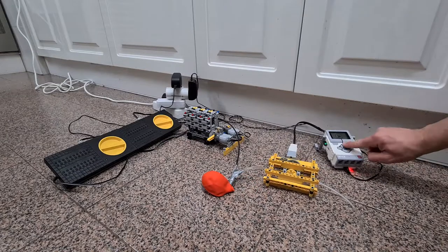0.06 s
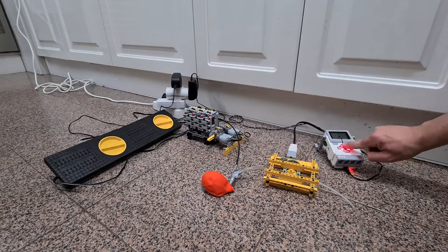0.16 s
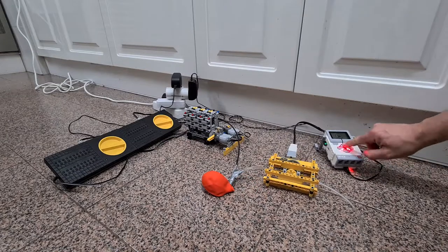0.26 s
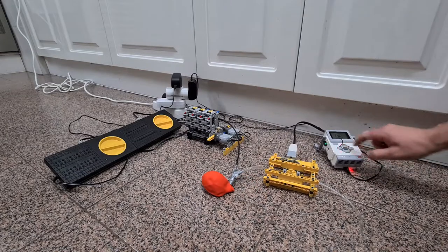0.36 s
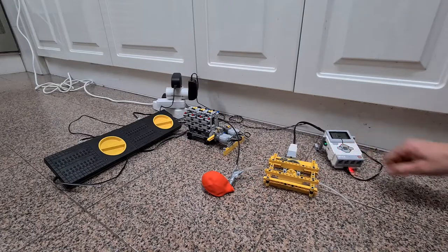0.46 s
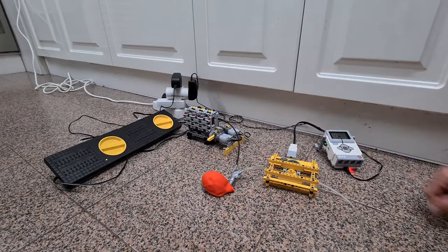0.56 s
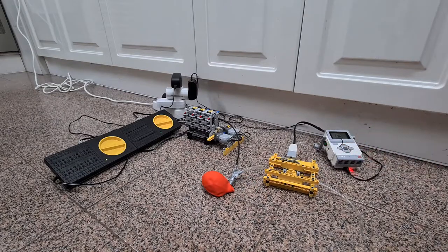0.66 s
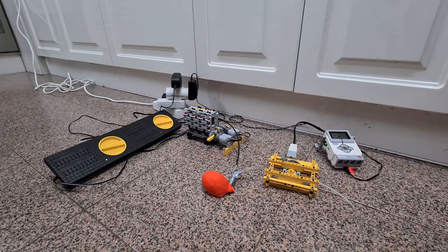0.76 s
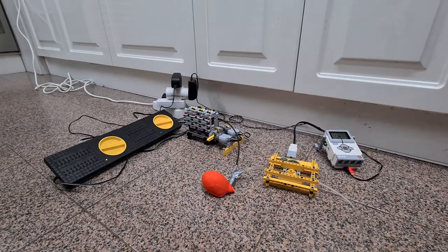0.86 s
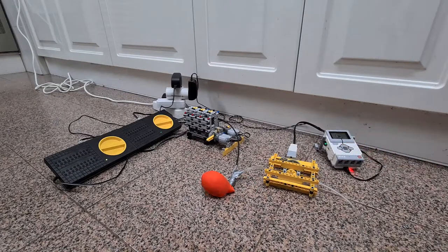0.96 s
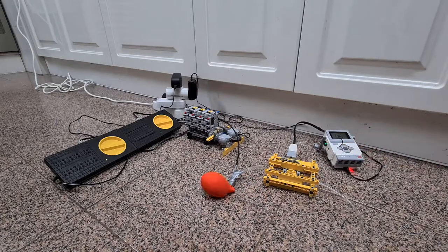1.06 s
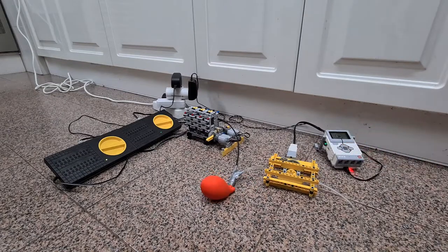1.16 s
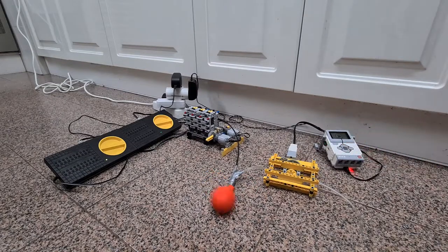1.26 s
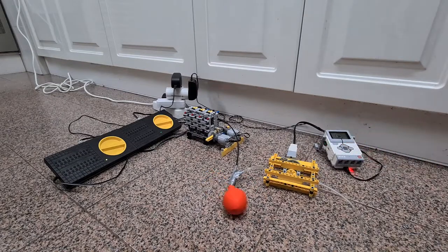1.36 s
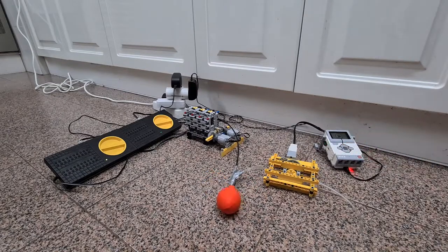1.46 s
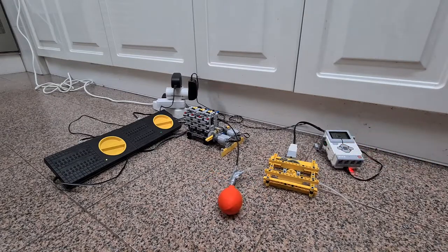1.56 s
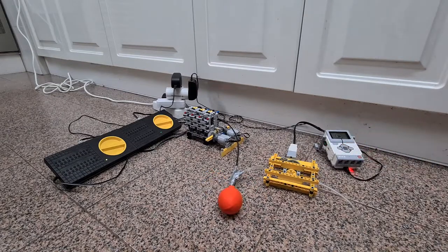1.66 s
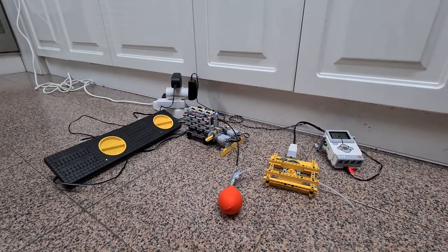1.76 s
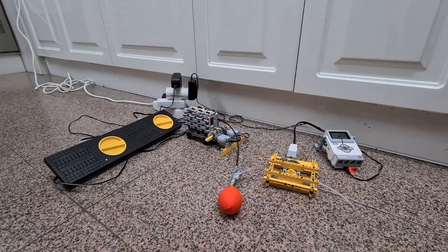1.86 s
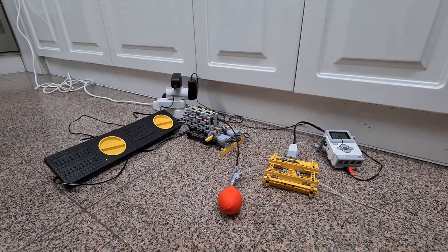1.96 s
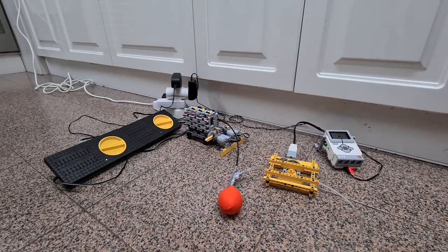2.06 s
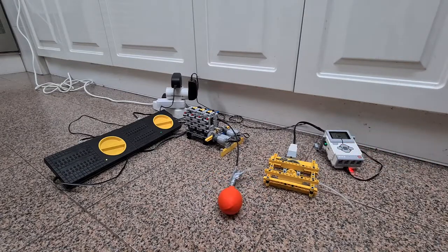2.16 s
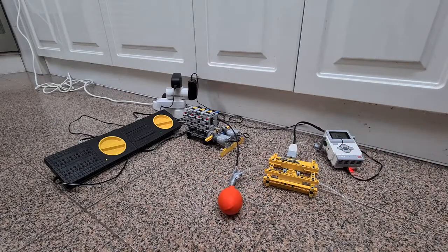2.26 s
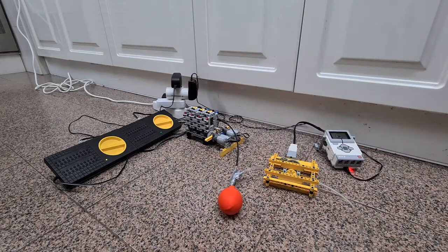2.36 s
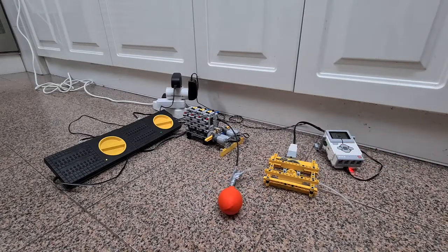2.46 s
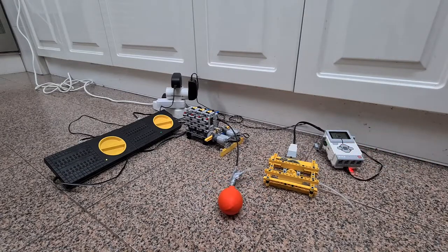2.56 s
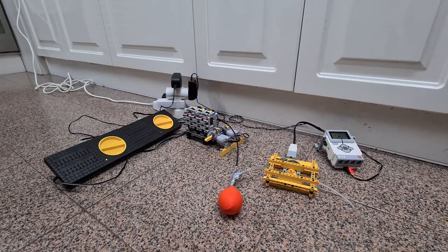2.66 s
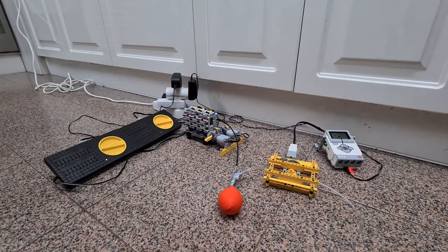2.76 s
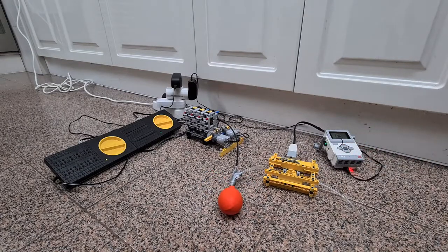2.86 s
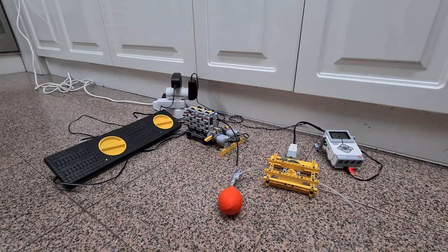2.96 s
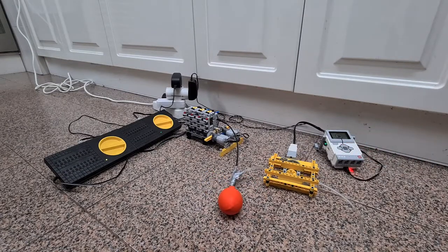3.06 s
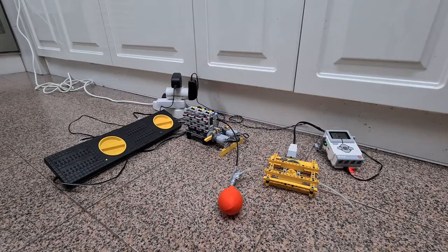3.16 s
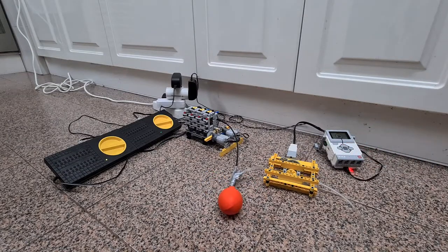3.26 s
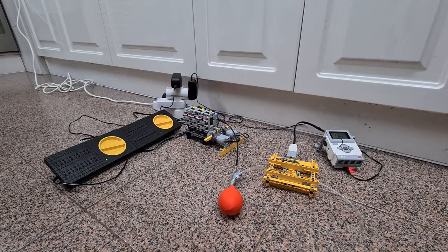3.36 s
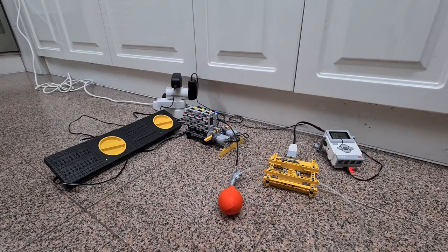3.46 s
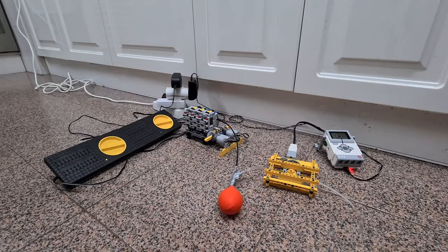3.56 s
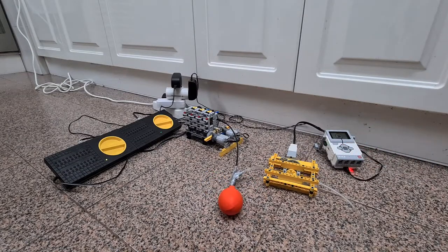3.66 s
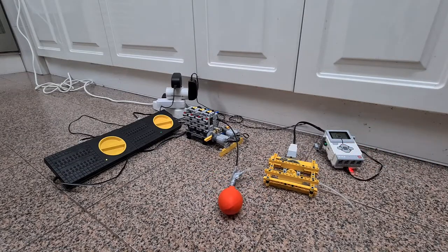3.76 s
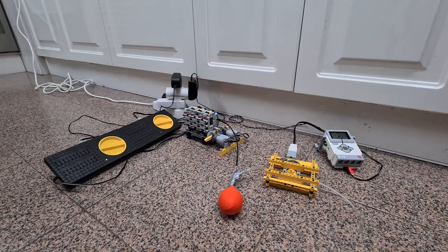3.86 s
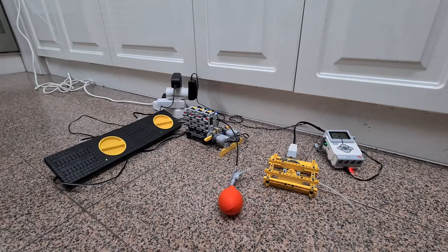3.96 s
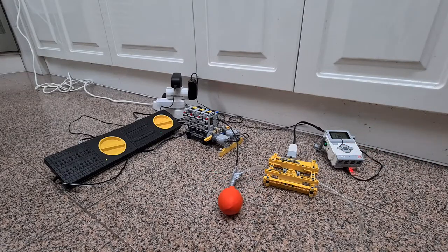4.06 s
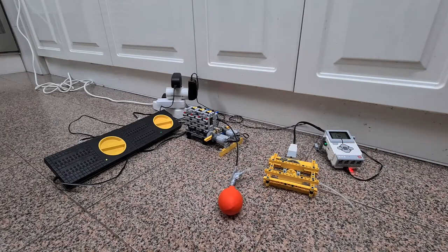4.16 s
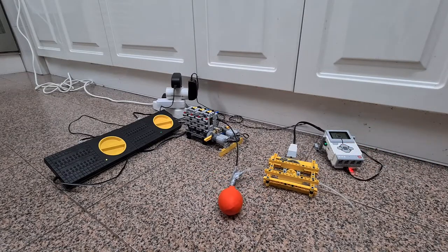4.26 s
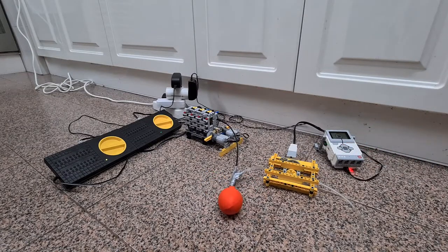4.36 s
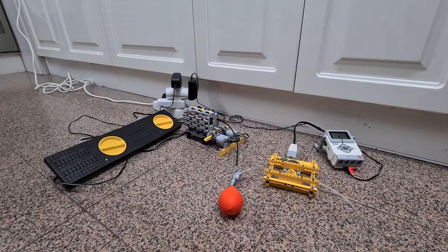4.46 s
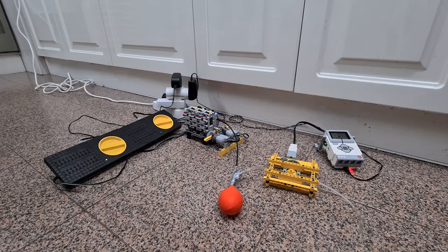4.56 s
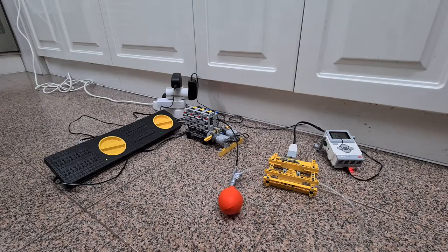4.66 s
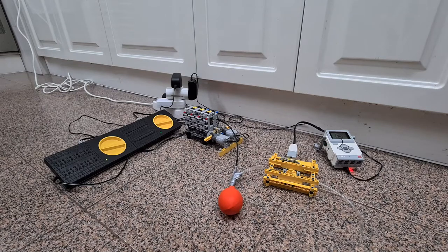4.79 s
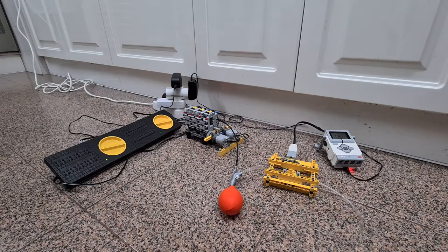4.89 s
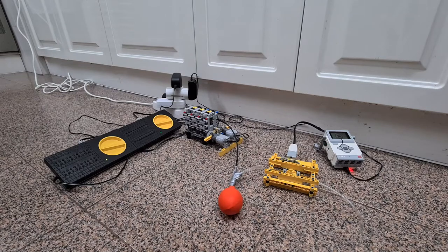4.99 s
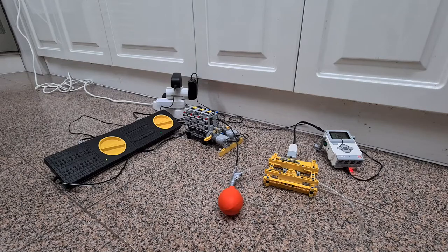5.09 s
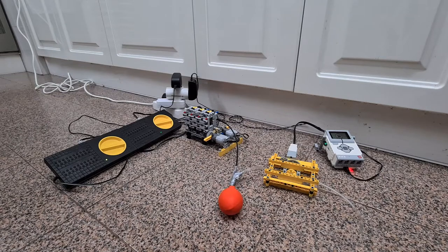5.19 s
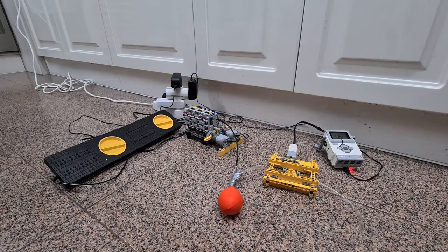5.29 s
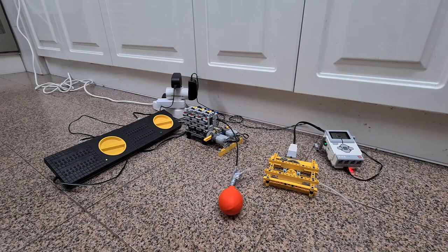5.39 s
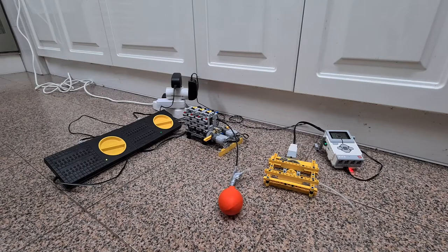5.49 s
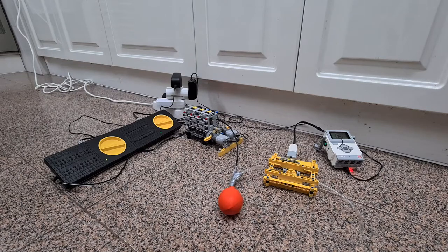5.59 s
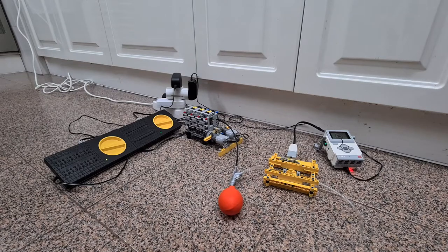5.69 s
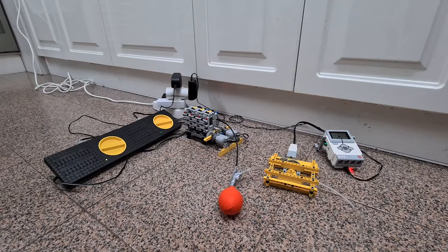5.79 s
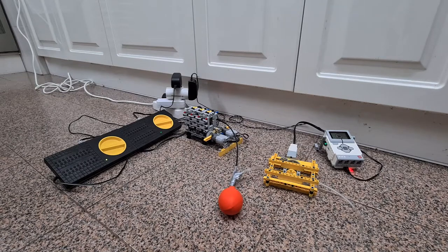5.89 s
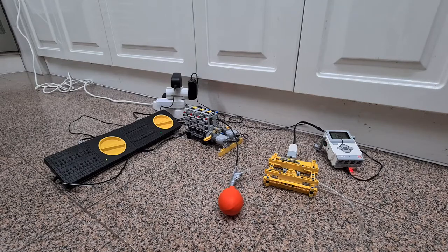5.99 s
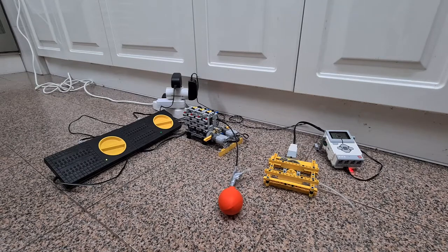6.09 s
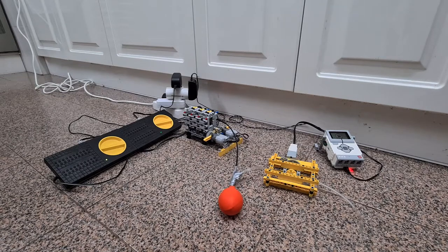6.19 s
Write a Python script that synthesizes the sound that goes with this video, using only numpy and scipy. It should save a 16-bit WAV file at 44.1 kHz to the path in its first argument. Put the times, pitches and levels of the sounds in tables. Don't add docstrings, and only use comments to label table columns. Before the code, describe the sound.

In a quiet kitchen, a finger presses a plastic button with a sharp snap, then lets it go with a duller knock. After a short pause, loose gears rattle and a small motor jumps to full speed. Toy piston pumps then run steadily to the end, with bright airy hiss, quick uneven valve ticking and a faint low throb. The microphone is fairly near, in stereo, with short hard-floor echoes.

```python
import sys
import numpy as np
from scipy import signal
from scipy.fft import rfft, irfft, next_fast_len
from scipy.io import wavfile

SR = 44100
rng = np.random.default_rng(int(sys.argv[2]) if len(sys.argv) > 2 else 0)


def elevation(decibels):
    levels = np.asarray(decibels, float)
    return 10 ** (levels / 20)


def inscribe(sig):
    pcm = np.round(np.clip(np.atleast_2d(sig).T, -1, 1) * 32767)
    wavfile.write(sys.argv[1], SR, pcm.astype(np.int16))


N = 274743
TIME = np.arange(N) / SR
SIZE = next_fast_len(N + SR // 2)
HZ = np.maximum(np.arange(SIZE // 2 + 1) * SR / SIZE, 1)

# start_s, level_db
GEAR_RUN_UP = [(.594, -74), (.599, -52), (.625, -49.5), (.645, -43), (.69, -49.5), (.755, -34), (.9, -33.7)]
# pitch_hz, level_db (per Hz)
GEAR_HISS = [(150, -32), (300, -23), (520, -21), (850, -13), (1150, -4), (1520, -12), (2300, -5),
             (3450, -5), (4330, -8), (5200, -4), (8400, -3), (9200, -6.5), (13000, -9.5), (14600, -12),
             (16500, -12.5)]
# pitch_hz, width_hz, level_db (over the hiss)
HOUSING = [(365, 83, 8), (445, 28, 11), (587, 55, 12.5), (757, 27, 6.5), (970, 120, 6), (1040, 86, 0.5),
           (1390, 470, 5), (1436, 44, 10)]
# pitch_hz, width_hz, level_db (over the hiss)
TUBE = [(1937, 65, 14), (2930, 180, 4), (2947, 510, 5.5), (3740, 300, 6.5), (4710, 130, 11),
        (4870, 150, 4.5), (5795, 400, 5), (6700, 470, 4), (7550, 120, 4.5), (8180, 120, 4)]
# pitch_hz, width_hz, level_db
HOLLOWS = [(513, 72, -10.5), (834, 57, -11), (1007, 4.7, -17), (1419, 21, -28), (1550, 43, -11),
           (2360, 39, -11), (3480, 56, -6.5), (4630, 68, 3), (5130, 90, -4.5)]
VALVE_DB = [-23.5, -27.5, -34, -27, -28.5, -34.5]
# pitch_hz, level_db (per Hz)
VALVE_TICK = [(300, -17), (1000, -5.5), (3000, -5.5), (6000, -1), (9000, -2), (12500, -2.5), (14500, -4.5),
              (16500, -11)]
# place_turns (0-1), swings_per_turn, peak_db
THROBS = [(.21, 12.4, -60), (.444, 13.2, -57.5), (.27, 16.8, -60), (.661, 16.8, -57.5), (.44, 29.1, -63),
          (.866, 12, -62), (.6, 59, -59), (.3, 57, -65), (.52, 77, -69), (.68, 95, -60), (.2, 119, -63),
          (.02, 93, -63), (.72, 118, -63)]
# pitch_hz, level_db (per Hz)
RUMBLE = [(20, -15), (40, -14.5), (80, -2), (120, -7.5), (200, -19), (400, -32)]
# start_s, peak_db
PRESS = [
    (.1267, -37.5),
    (.1279, -30),
    (.1297, -38),
    (.1317, -37.5),
    (.141, -48),
    (.1455, -56),
    (.162, -61),
]
# start_s, peak_db
RELEASE = [
    (.3346, -38),
    (.3392, -38),
    (.3503, -47),
    (.358, -55),
]
# start_s, peak_db
SLACK = [
    (.5982, -35),
    (.6015, -38),
    (.640, -45),
    (.646, -41),
    (.7105, -42),
    (.7555, -40),
    (.785, -41),
]
# pitch_hz, level_db, t60_s (time to fall 60 dB)
BUTTON_MODES = [(1100, -11, .012), (1410, -6, .012), (2070, -6, .01), (2800, -9, .008), (3640, -5, .008),
                (4340, -3, .007), (5000, -3, .006), (5570, -1, .007), (6300, -6, .006), (7200, -9, .006),
                (8100, -13, .005), (10300, -19, .004), (13000, -20, .003), (15300, -16, .003)]
# pitch_hz, level_db, t60_s
CASE_MODES = [(560, -14, .02), (1000, -9, .015), (1290, 2, .016), (1550, -7, .012), (2050, -10, .012),
              (3830, -22, .015), (4750, -23, .01), (5700, -18, .01)]
# pitch_hz, level_db, t60_s
RATTLE_MODES = [(1180, -4, .02), (2150, -9, .01), (2900, -8, .01), (4250, -5, .01), (5930, -3, .012),
                (8000, -11, .006), (11600, -14, .006)]
# start_s, pitch_hz, length_s, peak_db
KNOCKS = [
    (1.345, 680, .002, -47),
    (1.347, 414, .004, -52),
    (1.354, 600, .007, -54),
    (2.837, 95, .02, -50),
]
# pitch_hz, t60_s
ROOM_T60 = [(550, .13), (1700, .15), (5000, .21), (12000, .17)]
# pitch_hz, level_db (per Hz)
AIR = [(12, -41), (20, -13), (77, 2), (123, -15), (293, -2), (337, -13), (590, -7.5), (780, -12),
       (1190, -8.5), (1710, -19), (6540, -21.5), (8650, -31), (16000, -38)]
# pitch_hz, width_hz, level_db
WHINES = [(4414, 100, -91), (6487, 80, -89), (7014, 100, -95), (7876, 150, -95), (13200, 40, -97)]
# pitch_hz, likeness (0-1)
LIKENESS = [(60, 0.82), (130, 0.71), (290, 0.9), (640, 0.69), (1410, 0.5), (3100, 0.16), (6820, 0.13),
            (15000, 0.075)]
# pitch_hz, level_db
LEFT_OVER_RIGHT = [(60, -1), (110, 3), (200, -10.5), (380, 1), (700, -4), (1290, -0.5), (2380, -0.5),
                   (4400, -4), (8120, 1), (15000, -4)]


def gears(flutter_db):
    level_db = np.interp(TIME, *np.transpose(GEAR_RUN_UP), left=-140)
    teeth = rng.standard_normal((2, N)) * elevation(flutter_db * (drift(160) + .5 * drift(20)))
    power = 1
    for hz, width_hz, peak_db in list(HOUSING) + list(TUBE):
        power = power + (elevation(2 * peak_db) - 1) * bump(hz, width_hz)
    hollow_db = sum(2 * depth_db * bump(hz, width_hz) for hz, width_hz, depth_db in HOLLOWS)
    power = power * elevation(hollow_db)
    hiss = rms_one(spread(teeth, elevation(at_hz(GEAR_HISS)) * np.sqrt(power)))

    engaged = np.clip((TIME - .625) / .02, 0, 1)
    treble_db = (1 - engaged) * -14 + engaged * .07 * (level_db - level_db[-1])
    treble_db += .4 * (TIME - TIME.mean())
    treble = signal.sosfiltfilt(signal.butter(4, 8000, "high", fs=SR, output="sos"), hiss)
    hiss += (elevation(treble_db) - 1) * treble
    return hiss * elevation(level_db)


def valves(turn, decay_s):
    turns = 34
    lag_turns, early_turns, early_db = .003, .024, -14
    place = np.arange(6) / 6 + lag_turns
    place = np.r_[place, place - early_turns]
    level_db = np.r_[VALVE_DB, np.add(VALVE_DB, early_db)]
    due = (np.arange(1, turns + 1)[:, None] + place).ravel()
    chance = rng.standard_normal((len(due), 2))
    at = np.searchsorted(turn, due + .0012 * chance[:, 0])
    clicks = np.full(N + 1, 1e-18)
    clicks[at] = elevation(np.tile(level_db, turns) + 2 * np.clip(chance[:, 1], -2, 1.5))
    puff = signal.lfilter([1], [1, -np.exp(-1 / (decay_s * SR))], clicks[:N])
    return spread(puff * rng.standard_normal((2, N)), elevation(at_hz(VALVE_TICK)))


def frame(turn, level_db):
    throbs = np.zeros(N)
    push_back_db = -11 + 2.2 * TIME
    for place, swings, peak_db in THROBS:
        length = max(1.6 / swings, .07)
        off = (turn - place + .0015 * drift(1.2) + .5) % 1 - .5
        swell_db = peak_db + 1.2 * drift(1.5) + push_back_db * (swings < 12.5)
        swell = np.exp(-.5 * (off / length) ** 2) * elevation(swell_db)
        throbs += swell * np.cos(2 * np.pi * swings * off)
    throbs = elevation(level_db) * throbs * elevation([[-.6], [.6]])
    rumble = elevation(-64.5) * rms_one(spread(rng.standard_normal((2, N)), elevation(at_hz(RUMBLE))))
    started = np.clip((TIME - .65) / .08, 0, 1)
    return started * (throbs + rumble)


def struck(hits, modes, bass_hz, softness_hz):
    out = np.zeros((2, N))
    start_s, peak_db, pan_db = np.transpose(hits)
    at = (start_s * SR).astype(int)
    pan_db = pan_db * np.array([[.5], [-.5]])
    for hz, level_db, t60_s in modes:
        clicks = np.full((2, N), 1e-18)
        chance_db = 1.5 * rng.standard_normal((2, len(at)))
        sign = rng.choice([-1, 1], len(at))
        clicks[:, at] = sign * elevation(peak_db + level_db + chance_db + pan_db)
        fade, step = elevation(-60 / (t60_s * SR)), 2 * np.pi * hz / SR
        out += signal.lfilter([0, np.sin(step)], [1, -2 * fade * np.cos(step), fade * fade], clicks)
    return signal.sosfilt(signal.butter(3, [bass_hz, softness_hz], "band", fs=SR, output="sos"), out)


def creaked(hits, pan_db, count):
    gap_s, last_db, rise_db = .0042, -55, 4.5
    first_s = hits[0][0]
    lead = [(first_s - gap_s * k, last_db - rise_db * (k - 1)) for k in range(1, count + 1)]
    return [(start_s, peak_db, pan_db) for start_s, peak_db in lead + list(hits)]


def knocks():
    out = np.zeros(N)
    for start_s, hz, length_s, peak_db in KNOCKS:
        since = TIME - start_s
        swell = elevation(peak_db) * np.exp(-.5 * (since / length_s) ** 2)
        out += swell * np.cos(2 * np.pi * hz * since)
    return out


def kitchen(x, delay_s):
    tail = np.zeros((2, N))
    edges_hz = [300, 1000, 3000, 8000, 18000]
    for low_hz, high_hz, (_, t60_s) in zip(edges_hz, edges_hz[1:], ROOM_T60):
        band = signal.butter(2, [low_hz, high_hz], "band", fs=SR, output="sos")
        noise = signal.sosfilt(band, rng.standard_normal((2, N)))
        tail += noise * elevation(-60 * TIME / t60_s) * (TIME > delay_s)
    tail = spread(tail, 1)[:, :SR // 2]
    tail /= np.sqrt(np.sum(tail ** 2) / 2)
    return irfft(rfft(x, SIZE) * rfft(tail, SIZE), SIZE)[:, :N]


def quiet_room():
    air = elevation(-72) * rms_one(spread(rng.standard_normal((2, N)), elevation(at_hz(AIR))))
    for hz, width_hz, level_db in WHINES:
        whine = rms_one(spread(rng.standard_normal((2, N)), bump(hz, width_hz)))
        if hz > 10000:
            whine = whine * np.clip((TIME - .36) / .08, 0, 1)
        air += elevation(level_db) * whine
    return air


def spread(pair, gain):
    mid, side = rfft(pair, SIZE) * gain
    alike = np.clip(at_hz(LIKENESS), -1, 1)
    mid, side = np.sqrt(1 + alike) * mid, np.sqrt(1 - alike) * side
    tilt = elevation(at_hz(LEFT_OVER_RIGHT) / 2)
    lag_s = 1.15e-4 * np.minimum(HZ / 3500, 1) ** 2
    left = (mid + side) * tilt
    right = (mid - side) / tilt * np.exp(-2j * np.pi * HZ * lag_s)
    return irfft([left, right], SIZE)[:, :N]


def bump(hz, width_hz):
    return 1 / (1 + (2 * (HZ - hz) / width_hz) ** 2)


def at_hz(points):
    hz, value = np.transpose(points)
    return np.interp(np.log(HZ), np.log(hz), value)


def drift(rate_hz):
    r = np.exp(-2 * np.pi * rate_hz / SR)
    wander = signal.lfilter([1], [1, -2 * r, r * r], rng.standard_normal(N + SR))
    return rms_one(wander[SR:])


def rms_one(x):
    return x / np.sqrt(np.mean(x ** 2) + 1e-20)


def scene():
    first_turn_s, turns_per_s, speed_up_per_s2 = .7614, 6.32544, .007276
    since = TIME - first_turn_s
    turn = turns_per_s * since + .5 * speed_up_per_s2 * since ** 2

    pumps = gears(flutter_db=.94) + elevation(-4.5) * valves(turn, decay_s=.0047)
    pump_echo = elevation(-14) * kitchen(pumps, delay_s=.003)
    shaking = frame(turn, level_db=1.1)

    press = struck(creaked(PRESS, pan_db=-4, count=4), BUTTON_MODES, bass_hz=970, softness_hz=17000)
    release = struck(creaked(RELEASE, pan_db=-4, count=0), CASE_MODES, bass_hz=423, softness_hz=6030)
    slack = struck(creaked(SLACK, pan_db=-3, count=0), RATTLE_MODES, bass_hz=800, softness_hz=13000)
    hits = elevation(4) * press + elevation(-1.5) * release + elevation(-4) * slack
    hit_echo = elevation(-5.5) * kitchen(hits, delay_s=.0025)
    return pumps + pump_echo + shaking + hits + hit_echo + knocks() + quiet_room()


def top_cut(x):
    return signal.sosfilt(signal.butter(12, 17000, fs=SR, output="sos"), x)


def record(dry):
    treble_cut = np.clip((15770 - HZ) / 40, 0, 1)
    mix = irfft(rfft(dry, SIZE) * treble_cut, SIZE)[:, :N]
    return top_cut(mix)


dry = scene()
out = record(dry)
inscribe(out)
```